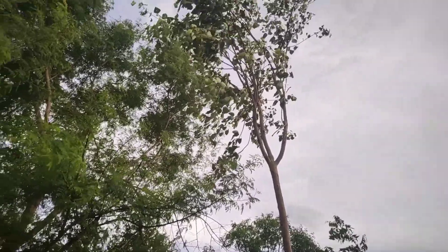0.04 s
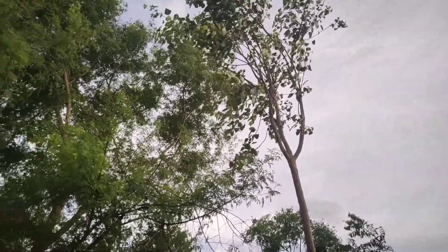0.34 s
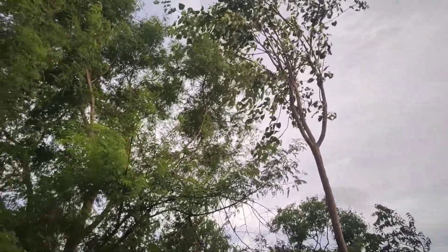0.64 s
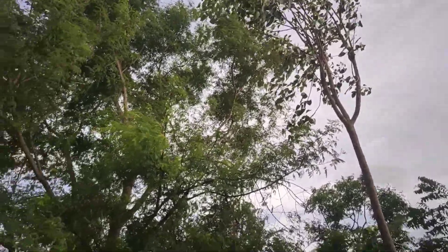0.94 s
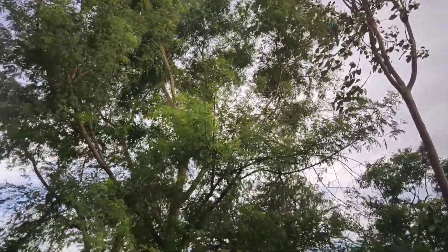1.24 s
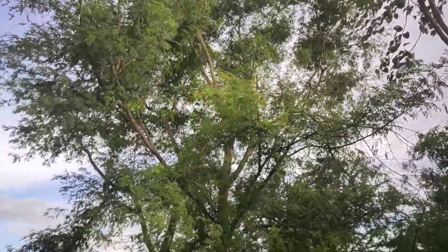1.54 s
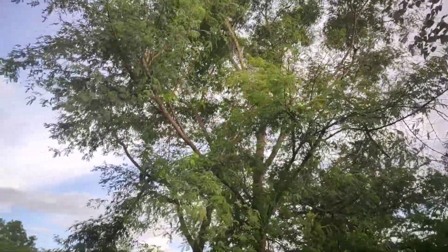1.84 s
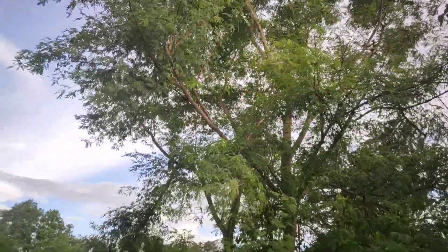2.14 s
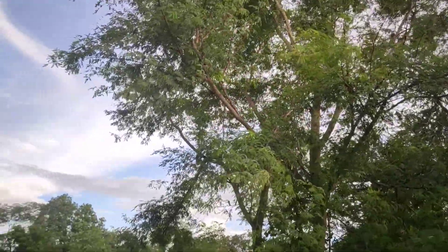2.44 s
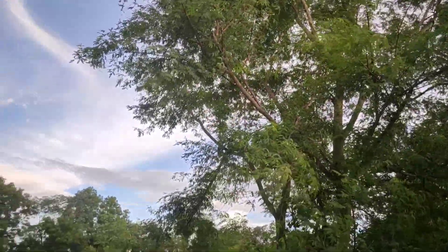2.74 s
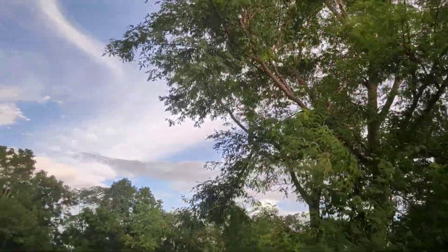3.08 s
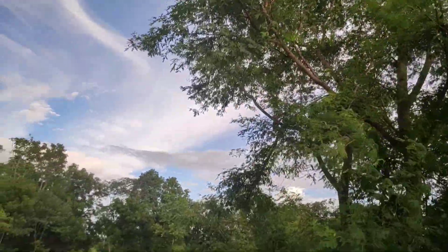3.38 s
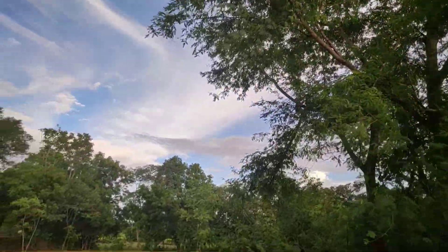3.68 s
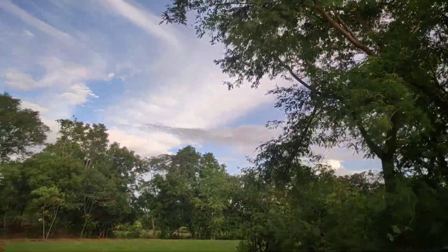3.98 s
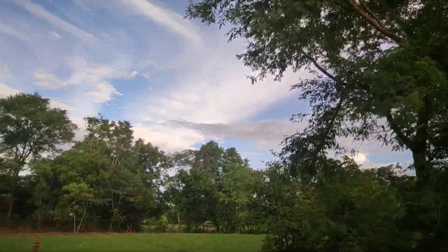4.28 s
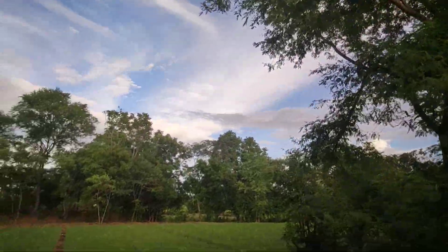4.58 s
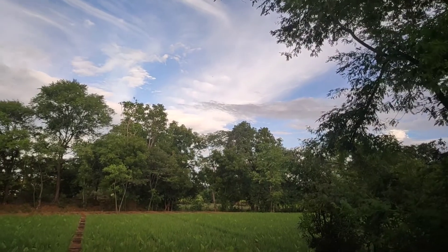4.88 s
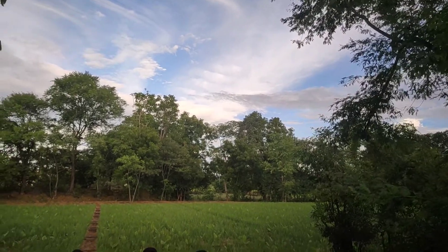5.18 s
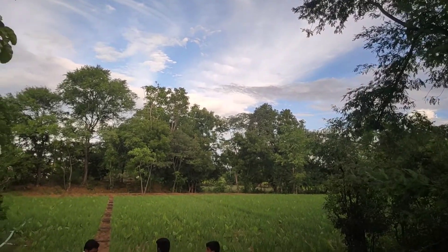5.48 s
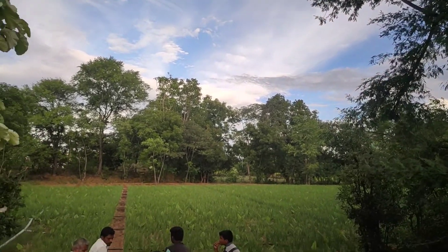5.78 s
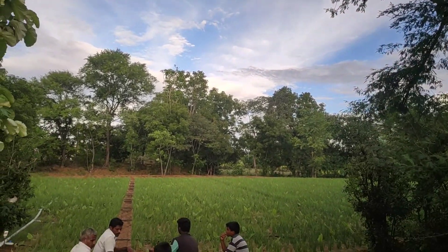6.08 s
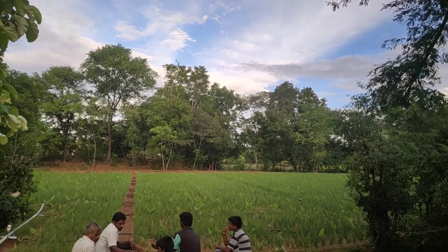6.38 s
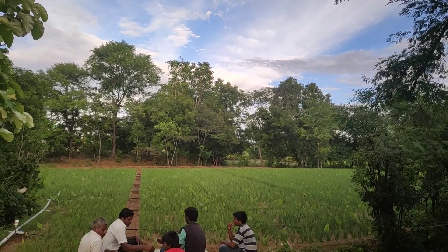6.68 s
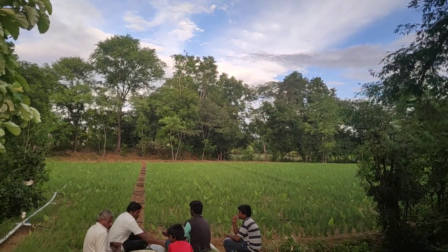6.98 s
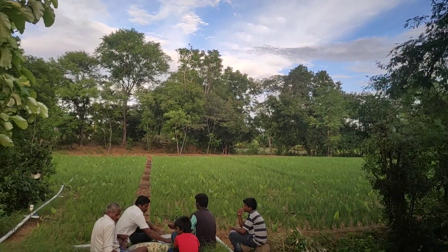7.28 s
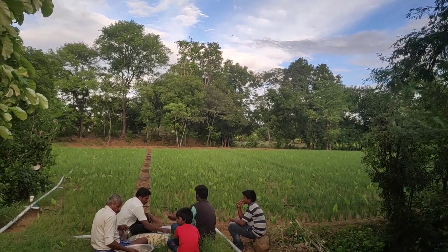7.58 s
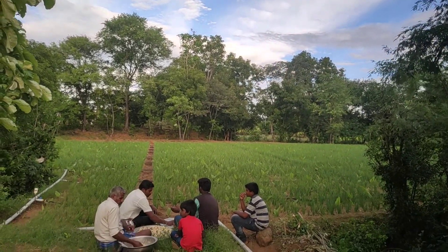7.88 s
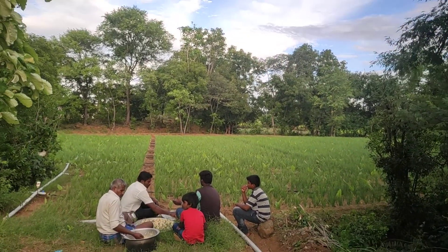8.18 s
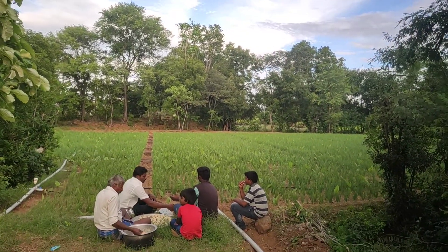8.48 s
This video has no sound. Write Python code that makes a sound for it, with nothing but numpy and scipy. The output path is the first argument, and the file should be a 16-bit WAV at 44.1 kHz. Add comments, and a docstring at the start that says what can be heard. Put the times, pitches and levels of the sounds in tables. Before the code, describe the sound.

Wind rumbles and thumps unevenly on the microphone beside a field edged with trees. Throughout, a parakeet repeats short bursts of harsh, squeaky screeches, each with a slight leafy echo, while far birds twitter in reply. Faint dry ticks sound near the start and something brushes softly through grass twice in the middle. The gusts weaken toward the end as the parakeet keeps calling.

```python
"""Parakeet beside a breezy field

A parakeet screeches from a tree in runs of two to four notes, and other birds answer far off.
Each note opens with a rasp, usually squeaks, then breaks to a lower voice that slides down.
Branches and leaves scatter the calls. Gusts buffet the microphone's two openings (left and right),
over light ticks, two soft scuffs in the grass and a quiet country hush."""
import sys
import numpy as np
from scipy import signal
from scipy.fft import rfft, irfft, next_fast_len
from scipy.io import wavfile
from scipy.ndimage import uniform_filter1d, map_coordinates

SR = 44100
rng = np.random.default_rng(int(sys.argv[2]) if len(sys.argv) > 2 else 0)


def wrap_up_sound(samples):
    """Save the sound to the file named by the first command line argument, as 16-bit audio."""
    columns = np.atleast_2d(samples).T
    # keep every value between -1 and 1, then stretch to whole-number steps
    tamed = np.clip(columns, -1, 1)
    steps = np.round(tamed * 32767).astype(np.int16)
    wavfile.write(sys.argv[1], SR, steps)


N = 376155
TIME = np.arange(N) / SR

# rasp_end_s, length_after_rasp_s, low_pitch_hz, sag_share, base_level_db, squeak_gain
SCREECHES = [(-.08, 0.12, 2588, 0.074, -19.5, 1), (.172, 0.11, 2624, 0.13, -20.5, None),
             (1.203, 0.13, 2502, -.02, -24.5, 1.57), (1.466, 0.12, 2515, 0.052, -24.5, 1.4),
             (2.702, 0.12, 2560, -.08, -23, 1.16), (2.96, 0.11, 2521, 0.044, -23.5, 0.56),
             (3.29, 0.11, 2532, 0.22, -25, .65), (3.526, 0.12, 2582, 0.13, -25.5, None),
             (4.49, 0.12, 2457, 0.046, -26, 0.67), (4.746, 0.12, 2530, 0.045, -25.5, 0.82),
             (5.018, 0.1, 2458, 0.065, -25.5, 0.51), (5.768, 0.12, 2405, -0.028, -25, 1.2),
             (6.028, .122, 2472, .03, -26, 1.3), (6.332, .102, 2396, 0.11, -25.5, 1),
             (6.597, 0.099, 2425, 0.11, -25, 1.3), (7.393, 0.13, 2522, 0.037, -24.5, 1.2),
             (7.656, 0.1, 2480, 0.022, -23.5, 0.96), (7.937, 0.11, 2424, 0.076, -24.5, 1.07)]
def parakeet(rasp_db=-26, squeak_hz=3700, growl_db=-17, breath_db=-16):
    """The bird rasps, squeaks, then drops to a low voice that gets rougher as it sinks."""
    out = np.zeros(N)
    for at, length, hz, sag, db, squeak_gain in SCREECHES:
        pressed = squeak_gain is None  # a pressed note goes straight from rasp to low voice
        squeak_s = 0 if pressed else .023 + .46 * (length - .12)
        rasp_s = .022 if pressed else .053 - squeak_s
        add(out, at - rasp_s - .003, rasp(rasp_s) * undb(rasp_db))
        if not pressed:
            u, fade = envelope(squeak_s)
            pitch = squeak_hz * (1 - .226 * (u - .25) ** 2 + .018 * rng.standard_normal())
            squeak = voice_box(pitch, jitter=.045, flutter_db=3.5)
            # uneven vibrations add a growl an octave below
            squeak += undb(growl_db) * voice_box(pitch / 2, jitter=.06, flutter_db=3.5, octave_db=-1)
            add(out, at - .001, squeak * fade * squeak_gain * undb(db + .1))
        u, fade = envelope(length - squeak_s - .004)
        effort_db = np.interp(u, [0, .8, 1], [3.5, 4, -1])
        root_db = -5 + (hz - 2480) / 40 - 6 * pressed  # strength of the lowest harmonic
        pitch = falling_pitch(u, hz, sag, pressed)
        voice = voice_box(pitch, jitter=.014 + .045 * u ** 5, flutter_db=3.2, root_db=root_db)
        add(out, at + squeak_s - .002, voice * fade * undb(db + effort_db))
    # air scratches through the throat in step with the voice
    loudness = np.sqrt(np.abs(uniform_filter1d(out ** 2, size=400)))
    scratch = undb(4 * wander(700))
    return out + undb(breath_db) * loudness * unit(noise(THROAT_TONE)[0] * scratch)


def falling_pitch(u, hz, sag, pressed, end_hz=1583):
    """The low voice starts high (or, if pressed, climbs to a peak), sags, then drops away."""
    onset = .11 * np.exp(-u / .0472)
    if pressed:
        onset = .12 * np.exp(-((u - .235) / .1) ** 2) - onset / 2
    final_drop = (hz * (1 - sag) - end_hz) * u ** 4
    return hz * (1 + onset - sag * u) - final_drop


# How the throat and beak shape the voice: frequency_hz, gain_db
THROAT_TONE = [(1600, -19.5), (2400, -6), (3000, 0.5), (3600, 3), (5000, -2), (5900, -5), (7400, -7.5),
               (8400, 4.5), (9900, 0.5), (11200, -8.5), (12400, -3), (13500, -14), (15000, -11.5)]
def voice_box(hz, jitter, flutter_db, octave_db=-4, root_db=0):
    """A shaky membrane makes harmonics (multiples of its pitch) that ring through the throat."""
    n = len(hz)
    hz = hz * (1 + jitter * wander(1500, n) + .01197 * wander(127.3, n))
    harmonic = np.arange(1, 9)[:, None]
    tilt = undb(octave_db * np.log2(harmonic) + root_db * (harmonic == 1))
    gains = gain_at(THROAT_TONE, harmonic * hz) * tilt * (harmonic * hz < SR / 2.2)
    voice = np.sum(gains * np.sin(harmonic * phase_of(hz)), axis=0)
    return voice * undb(flutter_db * wander(419.5, n))


# The hiss in the rasp: frequency_hz, gain_db
RASP_HISS = [(800, -23), (1500, 10), (2500, 23), (3700, 10), (6000, 14), (9000, 4), (15000, -33)]
def rasp(length, hz=2850, chaos=.151):
    """A chaotic vibration swells and rises; a long one settles into a hoarse chirp."""
    u, fade = envelope(length)
    settled = np.clip((u * length - .012) / .006, 0, 1) * np.clip((length - .024) / .012, 0, 1)
    pitch = hz * (1 + .3 * (u - .7) + .187 * u ** 8)
    voice = voice_box(pitch, jitter=.045 + chaos * (1 - settled), flutter_db=4.5, octave_db=-5)
    hiss = .9 * (1 - settled / 2) * noise(RASP_HISS, len(u))[0]
    return ((1 + settled / 2) * voice + hiss) * fade * undb(-9 * (1.5 - u))


# The tone of the echo from the leaves: frequency_hz, gain_db
LEAF_TONE = [(2400, 2), (3400, 2.5), (4600, 3), (9000, 0), (15000, -13)]
# The right side hears later as the microphone turns away: time_s, delay_s
RIGHT_DELAY = [(1.4, .00017), (2.8, 0.00024), (6, 0.000296)]
def through_trees(call, leaves_db, branch_db=-6.5, branches=14, tail_s=.38):
    """A call reaches the left side first; branches add separate echoes, leaves a soft tail."""
    t = TIME[:SR]
    decay = undb(-60 * t / tail_s) + undb(-23 - 60 * t / 1.2)
    tail = noise(LEAF_TONE, SR) * decay * np.minimum(t / .012, 1)
    echoes = undb(leaves_db) * unit(tail) / np.sqrt(SR)
    for side in echoes:
        delays_s = rng.uniform(.0006, .021, branches)
        signs = rng.choice([-1, 1], branches)
        side[(delays_s * SR).astype(int)] += undb(branch_db) * signs / np.sqrt(branches)
    lag_s = np.interp(TIME, *np.transpose(RIGHT_DELAY))
    right = map_coordinates(call, [(TIME - lag_s) * SR], order=3)
    return np.array([call, right]) + signal.fftconvolve(call[None], echoes, axes=1)[:, :N]


# The strength of the breeze: time_s, level_db
BREEZE_LEVELS = [(0.0, -21), (2.85, -28.5), (4.01, -18), (4.28, -28), (5.7, -21.5), (5.82, -24),
                 (6.22, -26.5), (6.65, -35.5), (7.08, -44), (7.24, -34.5), (7.82, -40), (8.53, -35)]
# Gusts, most hitting one side harder: peak_s, rumble_db, swirl_db, left_minus_right_db
GUSTS = [(0.095, -14, -18.5, -33), (0.336, -13.5, -22, -42), (0.463, -14.5, -19.5, -29),
         (0.915, -16, -23.5, -14), (1.086, -17.5, -19.5, -31), (1.258, -15, -23, -8.5),
         (2.202, -25.5, -36, -23), (2.647, -26.5, -36.5, -26), (3.25, -22.5, -31.5, 26),
         (3.467, -14.5, -19.5, -18), (3.788, -22, -21.5, 29), (3.865, -12.5, -17.5, -16),
         (3.937, -11, -15.5, 8), (4.018, -29, -17, -41), (4.095, -18, -14.5, -39),
         (4.369, -16.5, -25, -5.5), (4.583, -18, -27, -25), (4.731, -14.5, -22, -23),
         (5.08, -12, -17, -10.5), (5.276, -14, -32, 1.5), (5.471, -9.5, -28.5, 17), (5.605, -20, -25, -17),
         (5.675, -16, -29.5, 3), (5.836, -13.5, -27, 8), (6.15, -34, -30, -20), (6.19, -17.5, -28, -25),
         (6.26, -26, -29.5, -12), (7.101, -32, -32.5, -31), (7.154, -25.5, -43, -25),
         (7.31, -26.5, -41, -22), (8.373, -29, -48, -20)]
# The wind's deep rumble: frequency_hz, gain_db
RUMBLE_TONE = [(4, -15.5), (12, 4.5), (22, -0.5), (43, -4.5), (75, -10.5), (130, -24), (220, -40.5),
               (600, -71)]
# Small swirls of air: frequency_hz, gain_db
SWIRL_TONE = [(40, -2), (120, 4.5), (220, -3.5), (350, -14.5), (550, -29), (2500, -55)]
def wind(rise_s=.056, fall_s=.058, swirl_s=.016, kick_s=.0038, kick_over_swirl_db=12):
    """Air tumbles over the microphone: a rumble, bursts of swirls and a pressure kick per gust."""
    breeze = pan(-2) * undb(np.interp(TIME, *np.transpose(BREEZE_LEVELS)) + .5)
    rumble_power = breeze ** 2
    swirl_power = (breeze * undb(-16)) ** 2
    for peak, rumble_db, swirl_db, side_db in GUSTS:
        swell = np.exp(-((TIME - peak) / np.where(TIME < peak, rise_s, fall_s)) ** 2)
        rumble_power += (undb(rumble_db) * pan(side_db)) ** 2 * swell
        swirl_power += (undb(swirl_db) * pan(side_db)) ** 2 * np.exp(-np.abs(TIME - peak) / swirl_s)
    bursts = np.clip([wander(30), wander(30)], -2, 1.8)
    out = np.sqrt(rumble_power) * undb(2) * unit(noise(RUMBLE_TONE) * undb(3.7 * bursts))
    out += np.sqrt(swirl_power) * unit(noise(SWIRL_TONE) * undb(5 * bursts))
    from_peak = np.arange(-4 * kick_s, 4 * kick_s, 1 / SR) / kick_s
    pulse = (1 - 2 * from_peak ** 2) * np.exp(-from_peak ** 2)
    for peak, _, swirl_db, side_db in GUSTS:
        kick = pulse + .5 * noise(SWIRL_TONE, len(pulse)) * np.exp(-from_peak ** 2 / 3)
        add(out, peak - len(kick) / SR / 2, undb(swirl_db + kick_over_swirl_db) * pan(side_db) * kick)
    return out


# Far parakeets answering: start_s, length_s, pitch_hz, level_db
FAR_CALLS = [(1.106, 0.081, 2590, -39), (1.672, 0.043, 2860, -47), (1.939, 0.052, 2264, -36.5),
             (1.98, 0.03, 2750, -44), (2.104, 0.07, 2260, -45), (2.541, 0.062, 2074, -51),
             (4.382, 0.043, 2440, -43.5), (5.55, 0.033, 2490, -50.5)]
# Other birds' whistles and hoots: start_s, length_s, pitch_hz, mid_note_rise_share, level_db
FAR_WHISTLES = [(.4, .13, 2600, -.2, -43), (.7, .1, 2550, -.23, -40), (2.92, .6, 918, .045, -55),
                (5.43, .09, 2300, -.13, -40), (8.47, .09, 3400, 0, -49)]
def far_birds(twitters_per_s=14, twitter_db=-51, twitter_hz=(1300, 2500)):
    """Falling chirps, a flock's faint twitter and pure whistles carry over the field."""
    out = np.zeros(N)
    for start, length, hz, db in FAR_CALLS:
        add(out, start, undb(db) * far_chirp(length, hz))
    for when, long, high, quiet in rng.random((int(twitters_per_s * N / SR), 4)):
        chirp = far_chirp(.015 + .04 * long, np.interp(high, [0, 1], twitter_hz))
        add(out, when * N / SR, undb(twitter_db - 8 * quiet) * chirp)
    for start, length, hz, rise, db in FAR_WHISTLES:
        u, fade = envelope(length, edge_s=.0136)
        pitch = hz * (1 + rise * np.sin(np.pi * u)) * (1 + .012 * wander(211, len(u)))
        add(out, start, undb(db + 2 * wander(52, len(u))) * fade * np.sin(phase_of(pitch)))
    return out


def far_chirp(length, hz, fall_per_s=3.7, harmonics_db=(-7, 0, -10, -15)):
    """One note wavers as it falls, its top harmonics worn down by distance."""
    u, fade = envelope(length, edge_s=.01026)
    pitch = hz * (1 - fall_per_s * length * u) * (1 + .013 * wander(500, len(u)))
    voice = sum(undb(db) * np.sin(k * phase_of(pitch)) for k, db in enumerate(harmonics_db, 1))
    return voice * fade * undb(3 * wander(120, len(u)))


# Light, dry ticks: start_s, level_db, decay_s
DRY_TICKS = [(0.548, -41.5, 0.3), (0.622, -32, 0.021), (0.699, -34, 0.0054), (0.765, -34, 0.0053),
             (0.991, -39, 0.19), (1.047, -32, 0.0054), (2.564, -34, .004)]
def ticks():
    """Bright noise starts sharply and dies away: quickly for a tick, slowly for a rustle."""
    out = np.zeros((2, N))
    t = TIME[:SR // 2]
    bright_tone = [(800, -9), (4000, 15), (8500, 9), (15000, -2.5)]
    for start, db, decay_s in DRY_TICKS:
        add(out, start, noise(bright_tone, len(t)) * undb(db) * np.exp(-t / decay_s))
    return out


# Scuffs in the grass: middle_s, length_s, scrape_db, hiss_db
GRASS_SCUFFS = [(4.112, .26, -45, -38), (5.498, .24, -42, -45.5)]
# A scuff's hiss: frequency_hz, gain_db
GRASS_HISS = [(1500, -12), (2300, 8), (3200, 1), (4500, 6), (5800, -2), (8500, -5), (15000, -19)]
# A scuff's dull scrape: frequency_hz, gain_db
SCRAPE_TONE = [(400, -18), (650, 14), (1250, 2.5), (1550, -1), (2100, -2), (3200, -43)]
def scuffs(grain_db=3, scrape_lag_s=.04):
    """Something brushes through the grass: a grainy hiss, with a dull scrape just behind."""
    out = np.zeros((2, N))
    for middle, length, scrape_db, hiss_db in GRASS_SCUFFS:
        u, fade = envelope(length, edge_s=.21)
        swell = fade * undb(grain_db * wander(96, len(u)))
        start = middle - len(u) / SR / 2
        add(out, start, noise(GRASS_HISS, len(u)) * swell * undb(hiss_db))
        add(out, start + scrape_lag_s, noise(SCRAPE_TONE, len(u)) * swell * undb(scrape_db))
    return out


# The countryside's quiet background: frequency_hz, gain_db
HUSH_TONE = [(200, 2.5), (650, 4), (1300, -2), (2500, 2), (4200, -1), (6000, -6.5), (8500, -6),
             (14500, -13.5)]
def hush(level_db=-44.5):
    """Far leaves make a soft noise that barely swells."""
    return noise(HUSH_TONE) * undb(level_db + .5 * wander(1.6))


def undb(db):
    """Turn decibels into a gain to multiply by."""
    return 10 ** (np.asarray(db) / 20)


def unit(x):
    """Scale a sound to an average power of 1."""
    return x / np.sqrt(np.mean(x ** 2))


def gain_at(tone, hz):
    """Look up the gain at any frequency in a table of frequency_hz, gain_db."""
    frequencies, db = np.transpose(tone)
    return undb(np.interp(np.log(np.maximum(hz, 1)), np.log(frequencies), db))


def colour(x, tone):
    """Filter a sound with a tone table."""
    n = next_fast_len(x.shape[-1])
    gains = gain_at(tone, np.arange(n // 2 + 1) * SR / n)
    return irfft(rfft(x, n) * gains, n)[..., :x.shape[-1]]


def noise(tone, size=N):
    """Noise with the given tone, unrelated on left and right."""
    return unit(colour(rng.standard_normal((2, size)), tone))


def wander(per_s, size=N):
    """Glide between random values, mostly within -1 to 1."""
    steps = np.arange(size)
    return np.interp(steps * per_s / SR, steps, rng.standard_normal(size))


def phase_of(hz):
    """The running angle of a wave whose pitch changes."""
    return 2 * np.pi * np.cumsum(hz) / SR


def envelope(length, edge_s=.00404):
    """Progress u from 0 to 1 through a sound, and a fade in and out."""
    length = max(length, 0) + edge_s
    u = np.linspace(0, 1, int(length * SR))
    return u, np.clip(np.minimum(u, 1 - u) * length / edge_s, 0, 1)


def pan(left_minus_right_db):
    """Left and right gains that keep the total power the same."""
    gains = undb(np.array([[.5], [-.5]]) * left_minus_right_db)
    return gains / np.sqrt(np.mean(gains ** 2, axis=0))


def add(out, start_s, x):
    """Mix x into out at the given time."""
    offset = int(start_s * SR)
    first, end = max(offset, 0), min(offset + x.shape[-1], N)
    if end > first:
        out[..., first:end] += x[..., first - offset:end - offset]


def scene():
    """Mix it all. The parakeet sits to the left, so it sounds a little duller on the right."""
    left, right = through_trees(parakeet(), leaves_db=-8.5)
    left = colour(left, [(4500, 3.3), (8500, 2.4)])
    right = colour(right, [(4500, 3.5), (8500, -6.5), (13000, -1.5)])
    answers = through_trees(far_birds(), leaves_db=-8)
    return np.array([left, right]) + answers + ticks() + scuffs() + wind() + hush()


def record(dry):
    """Round off the strongest gusts at full scale and cut the highest treble steeply."""
    rounded = dry / (1 + dry ** 6) ** (1 / 6)
    treble_cut = signal.ellip(10, .1, 60, 15500, fs=SR, output="sos")
    return signal.sosfiltfilt(treble_cut, rounded)


dry = scene()
out = record(dry)
wrap_up_sound(out)
```